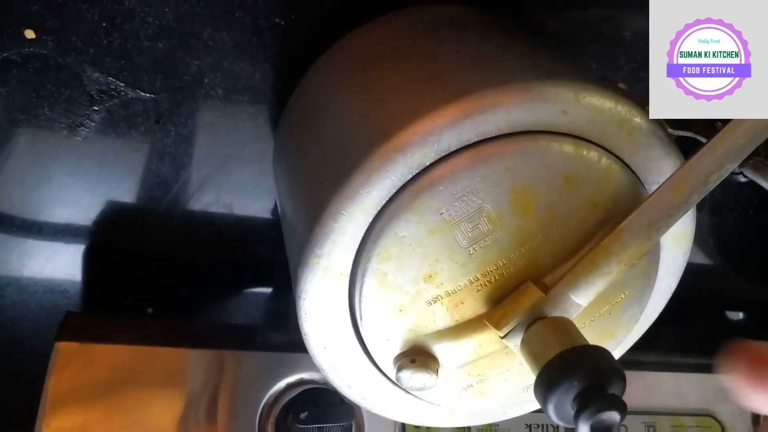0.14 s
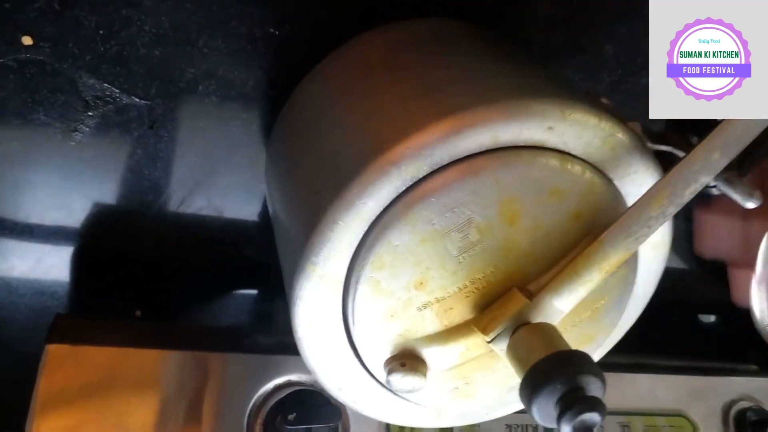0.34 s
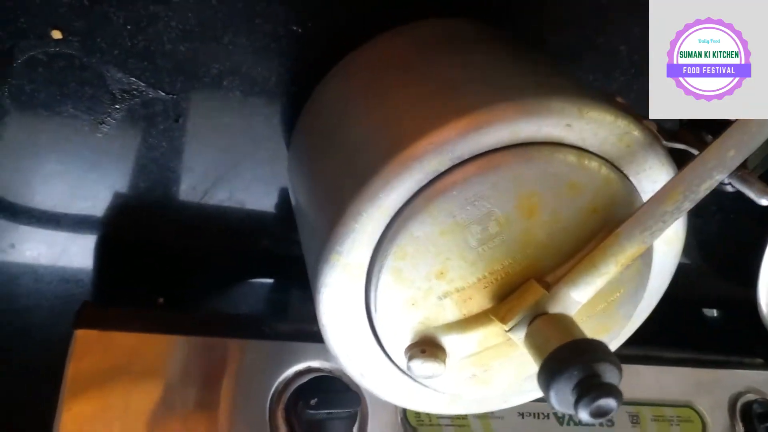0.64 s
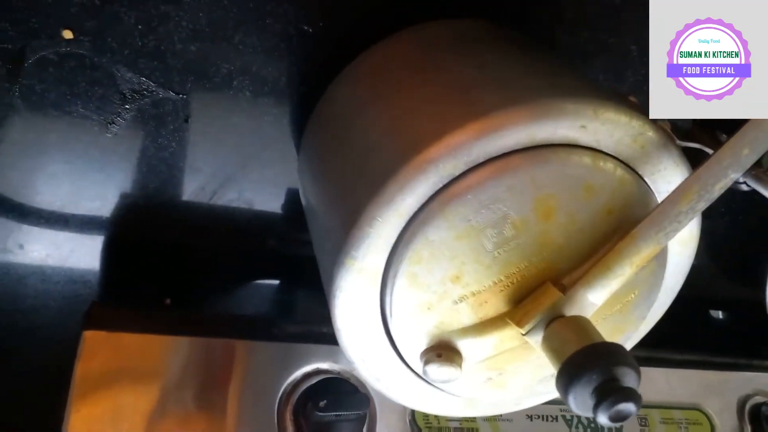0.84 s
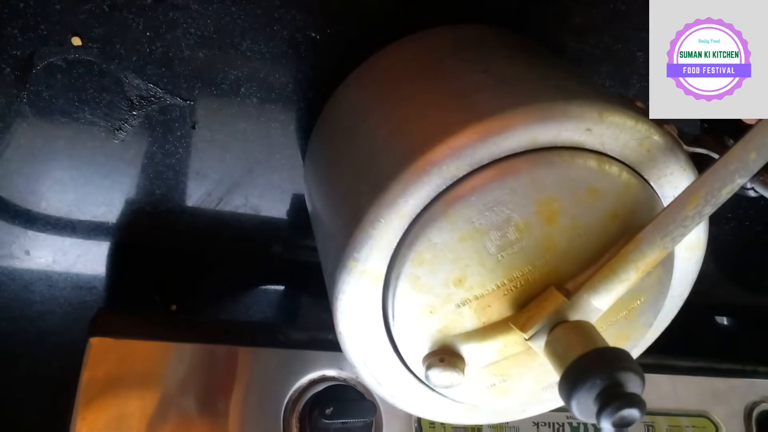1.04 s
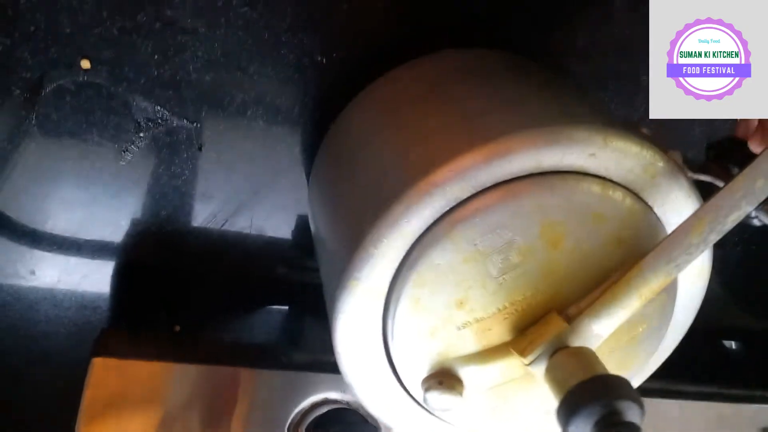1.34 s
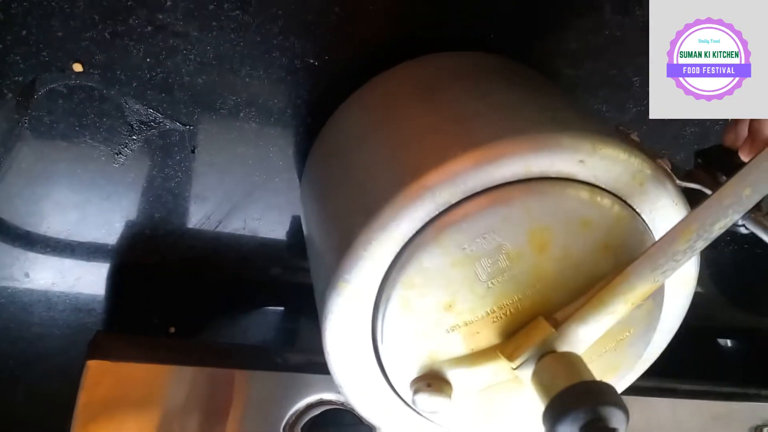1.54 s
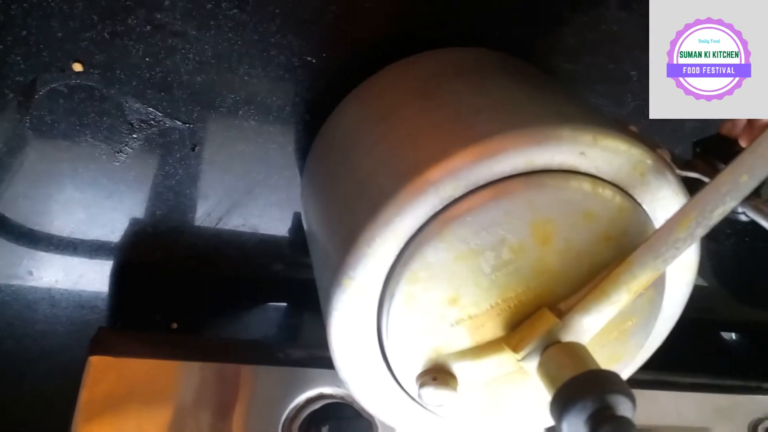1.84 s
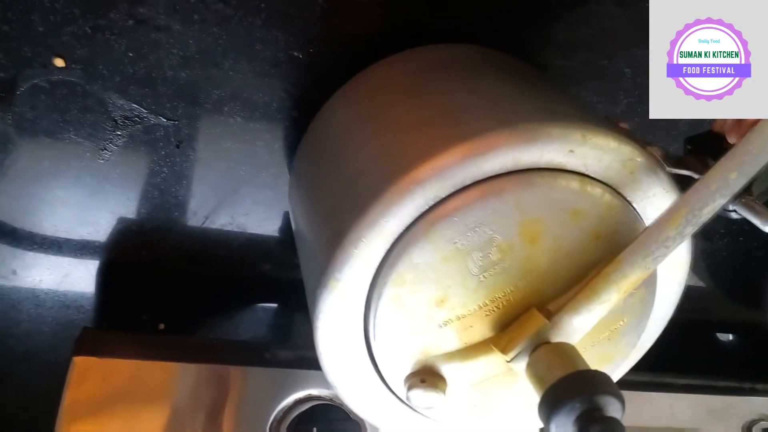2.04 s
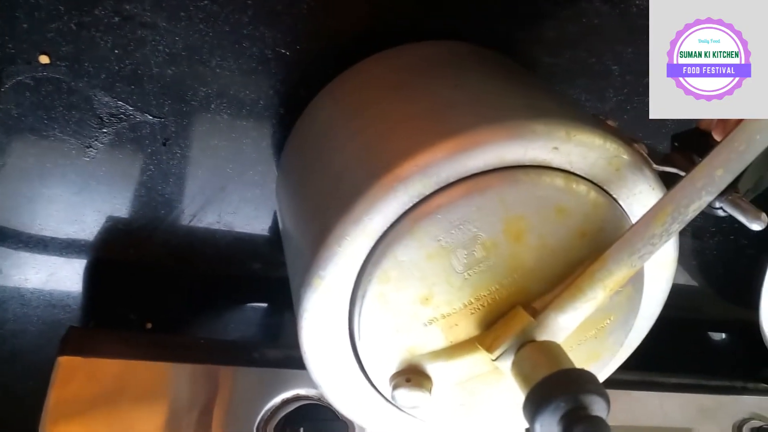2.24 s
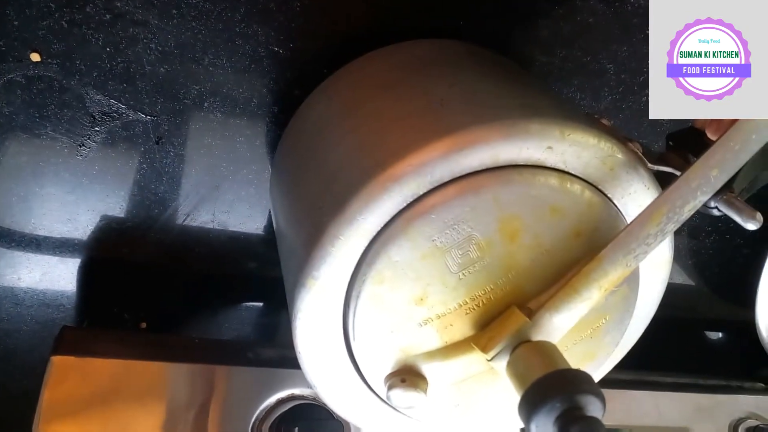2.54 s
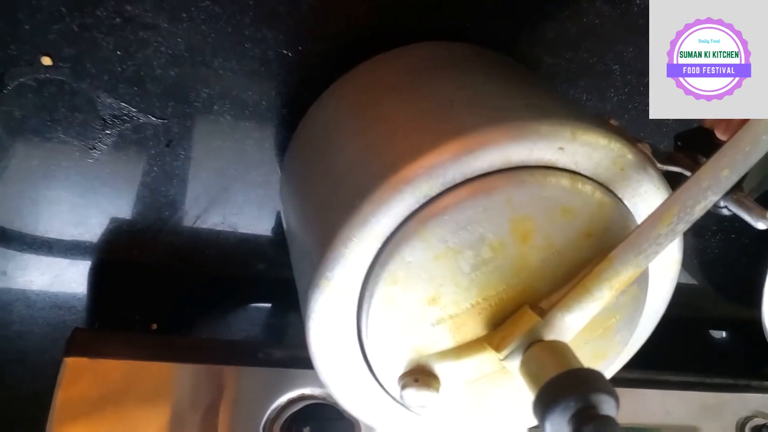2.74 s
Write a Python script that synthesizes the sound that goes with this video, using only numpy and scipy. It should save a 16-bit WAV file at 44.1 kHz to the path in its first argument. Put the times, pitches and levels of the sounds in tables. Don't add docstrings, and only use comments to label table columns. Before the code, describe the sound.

A pressure cooker blasts loud, piercing steam until about 0.09 seconds, when its weight clanks down, bounces and shakes the lid, ringing briefly in a small kitchen. Faint sputtering hiss continues, with thin squeals at 0.45-0.9. Soft knocks and clatter come around 0.6-0.7, stronger pot and dish rings at 1.7-1.83, then cloth rustle, handling rumble, a thin whistle near 2.1 and dull scrapes around 2.2-2.4.

```python
import sys
import numpy as np
from scipy import signal
from scipy.fft import rfft, irfft
from scipy.io import wavfile

SR = 44100
rng = np.random.default_rng(int(sys.argv[2]) if len(sys.argv) > 2 else 0)


def boost_factor(decibels):
    exponent = np.asarray(decibels, float) / 20
    return 10 ** exponent


def master(y):
    cut = np.clip(np.atleast_2d(y).T, -1, 1)
    pcm = np.round(cut * 32767)
    wavfile.write(sys.argv[1], SR, pcm.astype(np.int16))


N = 127890
T = np.arange(N) / SR
LEAD = SR

# frequency in Hz, level in dB per Hz.
JET_COLOUR = [(150, -37), (900, -27.5), (2500, -19.5), (3900, -18), (5000, -10), (7400, -13.5),
              (8200, -24.5), (15300, -13.5)]
# frequency in Hz, width in Hz, gain in dB.
JET_PEAKS = [(5311, 160, 14.5), (6290, 350, 6.5), (7240, 130, -1.5), (10000, 1800, 11.5),
             (13700, 1100, 5.5)]
# time in seconds, gain in dB.
CHOKES = [
    (0.07, -2),
    (0.075, -1),
]
# time in seconds, level in dB.
RUMBLE = [(0, -52.5), (.3, -86), (.6, -102), (1.6, -82), (1.75, -63.5), (2.1, -61), (2.3, -71), (2.9, -77)]
# frequency in Hz, level in dB per Hz.
FLOOR = [(15, -45.5), (25, -15), (69, -2.5), (218, -5.5), (412, -9), (579, -17.5), (4000, -22.5),
         (5200, -57), (8800, -120)]
# time in seconds, level in dB, brightness in dB per octave.
LEAK = [(.3, -56.5, 5.5), (.45, -62, 4), (.6, -61.5, 0), (.9, -64.5, 1), (1.05, -69.5, 8), (1.2, -67, 4),
        (1.3, -60.5, 1), (1.6, -60, -0.5), (1.85, -64.5, -1), (1.97, -67.5, 9), (2.05, -62, 5.5),
        (2.3, -63, 9.5), (2.45, -67.5, 13), (2.75, -66.5, 7), (2.9, -70, -0.5)]
# frequency in Hz, level in dB per Hz.
LEAK_COLOUR = [(1760, -34.5), (3000, -10), (3510, -16), (4070, -10.5), (5760, 3), (7560, -5.5), (8100, -12),
               (10000, -6.5), (15200, -15.5)]
# frequency in Hz, width in Hz, gain in dB.
LEAK_PEAKS = [(4700, 790, 1.5), (6200, 600, 0.5), (10500, 1300, 2), (14500, 1300, 2.5)]
# time in seconds, level over the hiss in dB.
SPITS = [
    (.52, 2.5),
    (1.35, 4.5),
    (1.58, 3.5),
    (1.661, 2.5),
    (1.98, 7),
    (2.79, 4),
]
# time in seconds, peak in dB, brightness in dB per octave.
DROPS = [
    (0.0768, -14, -1),
    (0.0944, 1.5, 0),
    (.105, -22, -1),
    (0.1112, -12, 0),
    (0.1176, -13, 0),
    (.122, -20, 0),
    (.1525, -21, -1),
    (.158, -27, 0),
    (0.6938, -27, -1),
    (1.7872, -22, -4),
]
# frequency in Hz, level in dB, T60 in seconds.
WEIGHT_MODES = [(300, -34, 0.35), (388, -15, 0.018), (700, -7, 0.011), (978, 0.5, 0.011), (1140, 1, 0.0058),
                (1580, -4, .012), (2520, -5, 0.0041), (3120, 0.5, 0.012), (3690, -9.5, 0.012),
                (10500, -9, .006)]
# frequency in Hz, level in dB per Hz.
SHAKE_COLOUR = [(300, -13.5), (900, 0), (1500, -5.5), (2100, -9.5), (3100, -6), (4200, -8.5), (9000, -28)]
# time in seconds, thud in dB, clatter in dB, thud brightness in dB per octave.
KNOCKS = [(0.097, -31, -60.5, 7), (0.6124, -41, -43.5, -13), (0.617, -32, -43.5, -10),
          (0.64, -40.5, -56, -5), (0.655, -45, -52, -6), (0.667, -29.5, -49, -12), (.678, -40.5, -56, 3),
          (0.695, -54, -44.5, -11), (0.713, -40, -67, 3.5), (1.708, -39.5, -35.5, 0),
          (1.7138, -46.5, -39, 6), (1.7276, -30.5, -55, -7), (1.7375, -39, -40.5, 11.5),
          (1.749, -24, -63, -4), (1.7617, -36, -50, -3), (1.78, -39.5, -45, 8), (1.791, -45, -58, 7.5),
          (1.809, -46.5, -69, 13.5), (1.829, -46.5, -70, 7)]
# frequency in Hz, level in dB, T60 in seconds.
TOP_MODES = [(118, -6.5, 0.057), (164.6, -1.5, 0.18), (219, 1.5, .09), (255, 2.5, 0.08), (304, -2.5, 0.1),
             (365, -9, 0.08), (447, -14, 0.08), (574.4, -25.5, 0.13)]
# frequency in Hz, level in dB per Hz.
CLATTER_COLOUR = [(400, -12), (700, -4.5), (1000, 1), (2000, -0.5), (3300, -7.5), (4500, -9), (8000, -25)]
# start in seconds, length in seconds, first Hz, last Hz, level in dB.
WHISTLES = [
    (0.392, 0.053, 10800, 12320, -68.5),
    (0.393, 0.072, 3850, 4170, -69),
    (1.191, 0.08, 12270, 11700, -71.5),
    (1.271, 0.078, 12160, 12180, -65.5),
    (2.036, 0.24, 5530, 5600, -61.5),
    (2.109, 0.041, 6200, 5660, -54),
    (2.11, 0.11, 11700, 12000, -65.5),
]
# time in seconds, pitch in Hz, level in dB, octave-below level in dB.
SQUEALS = [
    [(.455, 9090, -87.5, -100), (.468, 9700, -68, -93), (.48, 8440, -68, -93), (.505, 8280, -75, -95),
     (.515, 9100, -71, -97), (.535, 8250, -74, -95), (.57, 8500, -67, -95), (.58, 9360, -65.5, -95),
     (.592, 8800, -85, -100)],
    [(.59, 8000, -85, -100), (.6, 8100, -76, -95), (.625, 8400, -68.5, -95), (.642, 9800, -75, -95),
     (.65, 9800, -90, -100)],
    [(.716, 9500, -85, -100), (.724, 8970, -57, -90), (.735, 8940, -64.5, -90), (.775, 8840, -66, -85),
     (.782, 9700, -62, -61), (.798, 9650, -60, -61), (.81, 8800, -62, -61), (.814, 9440, -64, -68),
     (.818, 9630, -60, -64)],
    [(.818, 9360, -66, -68), (.838, 9800, -62, -62), (.85, 9740, -62, -66), (.858, 9450, -66, -60),
     (.874, 9950, -65, -70), (.882, 9700, -77, -63), (.905, 9630, -81, -65.5), (.915, 9280, -100, -90.5)],
]
# time in seconds, level in dB, brightness in dB per octave.
POT_HITS = [
    (0.613, -38.5, -5),
    (0.62, -42, -1.5),
    (0.696, -57, 4),
    (1.7089, -52, 10),
    (1.7137, -49.5, 5),
    (1.725, -32, -3.5),
    (1.737, -57, 14),
]
# frequency in Hz, level in dB, T60 in seconds.
POT_MODES = [(1557, -3, 0.16), (1593, 5.5, 0.054), (2120, -7, 0.017), (2307, -8.5, 0.13), (2530, -9, 0.17),
             (2975, -5, 0.029), (3090, 2, 0.072), (3900, -26, 0.022)]
# time in seconds, level in dB.
RUSTLE = [(1.2, -94), (1.33, -70.5), (1.5, -63), (1.68, -70.5), (1.8, -62.5), (1.9, -59.5), (2.0, -54.5),
          (2.18, -59), (2.36, -57), (2.42, -67.5), (2.6, -79), (2.75, -74), (2.85, -72.5)]
# frequency in Hz, level in dB per Hz.
RUSTLE_COLOUR = [(240, -31), (400, -3), (1760, -0.5), (4550, -11), (5920, -9), (8000, -22.5),
                 (10400, -47.5), (17600, -120)]
# start in seconds, length in seconds, level in dB, slips per second, dB per octave.
DRAGS = [
    (1.27, 0.18, -68.5, 111, 2.5),
    (1.9, 0.23, -59, 70, -3.5),
    (2.195, 0.077, -47.5, 109, 9),
    (2.25, 0.093, -42.5, 120, 0.5),
    (2.35, 0.093, -58.5, 83, 0),
    (2.644, 0.11, -63, 170, 7.5),
    (2.77, 0.11, -69.5, 113, 3.5),
]
# time in seconds, level in dB.
DISH_HITS = [
    (1.7078, -32.5),
    (1.715, -38),
    (1.7615, -40.5),
    (1.828, -44),
]
# frequency in Hz, level in dB, T60 in seconds.
DISH_MODES = [(571, -8, .18), (657, -8.5, 0.14), (802, -8.5, 0.039), (1978, -7.5, 0.043),
              (2110, -15, 0.065)]
# frequency in Hz, T60 in seconds.
KITCHEN_T60 = [(150, 0.6), (300, 0.69), (500, 0.51), (2000, .5), (6000, 0.36), (10000, .46), (13000, .24)]


def rms_one(x):
    return x / np.sqrt(np.mean(x ** 2) + 1e-20)


def in_time(rows):
    s, *columns = np.transpose(rows)
    return [np.interp(T, s, column) for column in columns]


def at_hz(points, hz):
    table_hz, values = np.transpose(points)
    return np.interp(np.log(hz), np.log(table_hz), values)


def drift(rate_hz, size=N):
    r = np.exp(-80 * np.pi * rate_hz / SR)
    white = rng.standard_normal(size // 40 + 2002)
    slow = signal.lfilter([1], [1, -2 * r, r * r], white)[2000:]
    return np.interp(np.arange(size) / 40, np.arange(len(slow)), rms_one(slow))


def phase_of(hz):
    return np.cumsum(hz) * 2 * np.pi / SR


def bump(t, s, width_s):
    return np.exp(-((t - s) / width_s) ** 2)


def ring(clicks, hz, t60_s):
    r, w = boost_factor(-60 / (t60_s * SR)), 2 * np.pi * hz / SR
    return signal.lfilter([0, np.sin(w)], [1, -2 * r * np.cos(w), r * r], clicks + 1e-18)


def noise(colour, peaks=(), size=N):
    hz = np.maximum(np.fft.rfftfreq(size, 1 / SR), 1)
    db = at_hz(colour, hz)
    for peak_hz, width_hz, gain_db in peaks:
        db = db + gain_db / (1 + (2 * (hz - peak_hz) / width_hz) ** 2)
    octaves_below = np.maximum(np.log2(colour[0][0] / hz), 0)
    octaves_above = np.maximum(np.log2(hz / colour[-1][0]), 0)
    db = db - 18 * (octaves_below + octaves_above)
    return rms_one(irfft(rfft(rng.standard_normal(size)) * boost_factor(db), size))


def bands(x):
    hz, spectrum = np.maximum(np.fft.rfftfreq(len(x), 1 / SR), 1), rfft(x)
    for centre_hz in 60 * 2 ** np.arange(0, 8.5, .5):
        weights = np.maximum(1 - 2 * abs(np.log2(hz / centre_hz)), 0)
        yield centre_hz, irfft(spectrum * weights, len(x))


def strike(times_s, modes, levels_db, spread_db, tilt_db=0, sign=-1):
    luck, out = rng.standard_normal((len(times_s), len(modes))), 0
    at = (np.asarray(times_s) * SR).astype(int)
    for k, (hz, db, t60_s) in enumerate(modes):
        octaves = np.log2(hz / modes[1][0])
        clicks = np.zeros(N)
        np.add.at(clicks, at, boost_factor(levels_db + db + tilt_db * octaves + spread_db * luck[:, k]))
        out = out + sign ** k * ring(clicks, hz, t60_s)
    return out


def soft(x, cut_hz=756):
    return signal.sosfilt(signal.butter(2, cut_hz, fs=SR, output="sos"), x)


def dying(times_s, levels_db, t60_s):
    return sum(boost_factor(db - 60 * np.maximum(T - s, 0) / t60_s) * (T > s) for s, db in zip(times_s, levels_db))


def kitchen(x):
    t = np.arange(SR) / SR
    tail = sum(b * boost_factor(-60 * t / at_hz(KITCHEN_T60, hz)) for hz, b in bands(rng.standard_normal(SR)))
    tail = tail * (t > 0.001)
    return signal.fftconvolve(x, tail / np.sqrt(np.sum(tail ** 2)))[:len(x)]


def jet():
    level_db, sag_db_per_s, end_s, close_db_per_s = -18, 38.5, 0.084, 599
    tone_hz, tone_db, tone_waver, wet_db = 5380, -7, 0.0026, -10.5
    size = N + LEAD
    t = np.arange(-LEAD, N) / SR
    gain = boost_factor(level_db - sag_db_per_s * np.maximum(t, 0) - close_db_per_s * np.maximum(t - end_s, 0))
    tone = boost_factor(tone_db) * np.sin(phase_of(tone_hz * (1 + tone_waver * drift(40, size))))
    hiss = noise(JET_COLOUR, JET_PEAKS, size)
    flutter_db = 1.8 * drift(52, size) + sum(db * bump(t, s, 0.001) for s, db in CHOKES)
    direct = (hiss + tone) * gain * boost_factor(flutter_db)
    room_peaks = [(hz, width_hz, 0.44 * db) for hz, width_hz, db in JET_PEAKS]
    around = (noise(JET_COLOUR, room_peaks, size) + 0.78 * tone) * gain
    return (direct + boost_factor(wet_db) * kitchen(around))[LEAD:]


def rumble():
    return boost_factor(in_time(RUMBLE)[0] + 1.1 * drift(8)) * noise([(35, -5.0), (50, -2.5), (110, -3.5)])


def room_floor():
    return boost_factor(-78.5) * noise(FLOOR)


def leak():
    db, tilt_db = in_time(LEAK)
    sputter_db = 0.9 * drift(20) + sum(spit_db * bump(T, s, .008) for s, spit_db in SPITS)
    out = np.zeros(N)
    for hz, band in bands(noise(LEAK_COLOUR, LEAK_PEAKS)):
        if hz > 1500:
            out += band * boost_factor(db + sputter_db + tilt_db * np.log2(hz / 8000) + 1.7 * drift(13))
    return out


def weight():
    s, db, tilt_db = np.transpose(DROPS)
    clank = soft(strike(s, WEIGHT_MODES, db - 5.5, spread_db=3.0, tilt_db=tilt_db), 5000)
    return clank, dying(s, db - 26.5, t60_s=0.096) * noise(SHAKE_COLOUR)


def knocks():
    s, thud_db, clatter_db, tilt_db = np.transpose(KNOCKS)
    clatter = dying(s, clatter_db, t60_s=0.068) * noise(CLATTER_COLOUR)
    crack = dying(s, clatter_db - 5, t60_s=0.022) * noise([(3000, -1.5), (7000, -7), (15000, -15.5)])
    thuds = soft(strike(s, TOP_MODES, thud_db - 6.5, spread_db=2.0, tilt_db=tilt_db, sign=0.93))
    return thuds, clatter + crack


def whistles():
    out, waver, rough = np.zeros(N), np.tanh(drift(150)), 1 + .55 * drift(170)
    for s, length_s, from_hz, to_hz, db in WHISTLES:
        u = (T - s) / length_s
        hz = from_hz + (to_hz - from_hz) * np.clip(u, 0, 1)
        fade = np.clip(5 * np.minimum(u, 1 - u), 0, 1)
        out += boost_factor(db) * fade * rough * np.sin(phase_of(hz * (1 + .018 * waver)))
    return out


def squeals():
    out, waver, rough = np.zeros(N), drift(90), 1 + .55 * drift(170)
    for rows in SQUEALS:
        hz, db, half_db = in_time(rows)
        phase = phase_of(hz * (1 + .008 * waver))
        tones = boost_factor(db) * np.sin(phase) + boost_factor(half_db) * np.sin(phase / 2)
        out += (T >= rows[0][0]) * (T < rows[-1][0]) * rough * tones
    return out


def pot():
    s, db, tilt_db = np.transpose(POT_HITS)
    return soft(strike(s, POT_MODES, db, spread_db=2.6, tilt_db=tilt_db), 5000)


def rustle():
    db, = in_time([(.8, -102)] + list(RUSTLE))
    together_db = 0.5 * drift(10)
    cloth = bands(noise(RUSTLE_COLOUR))
    return sum(b * boost_factor(db + together_db + 2.2 * drift(7.1)) for hz, b in cloth if hz > 200)


def drags():
    damped = [(hz, db, .6 * t60_s) for hz, db, t60_s in TOP_MODES[:-1]]
    out = 0
    for s, length_s, db, slips_per_s, tilt_db in DRAGS:
        luck = rng.standard_normal((40, 2))
        times_s = s + (np.arange(40) + .3 * luck[:, 0]) / slips_per_s
        swell = 3 * np.minimum(times_s - s + .01, s + length_s - times_s) / length_s
        slip_db = db + 20 * np.log10(np.clip(swell, 1e-4, 1)) + 1.5 * luck[:, 1]
        out = out + strike(times_s.clip(0, T[-1]), damped, slip_db, spread_db=3, tilt_db=tilt_db)
    return soft(out, 520)


def dish():
    s, db = np.transpose(DISH_HITS)
    return strike(s, DISH_MODES, db, spread_db=2.0)


def scene():
    clank, shake = weight()
    thuds, clatter = knocks()
    rings, noises, lows = clank + pot() + dish(), shake + clatter, thuds + drags()
    wet = kitchen(0.24 * rings + noises + 0.44 * lows)
    hits = rings + noises + lows + boost_factor(-6.5) * wet
    airborne = signal.sosfilt(signal.butter(4, 125, "high", fs=SR, output="sos"), jet() + hits)
    close = leak() + whistles() + squeals() + rustle()
    return (airborne + close + rumble() + room_floor())[None]


def top_cut(x):
    return signal.sosfilt(signal.butter(12, 15390, fs=SR, output="sos"), x)


def record(dry):
    mix = signal.sosfilt(signal.ellip(10, .5, 45, 15450, fs=SR, output="sos"), dry)
    return top_cut(mix)


dry = scene()
out = record(dry)
master(out)
```